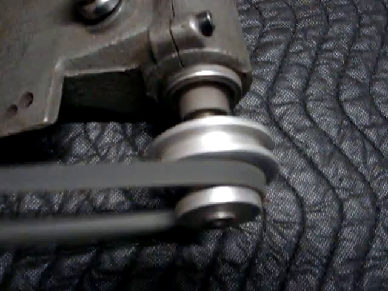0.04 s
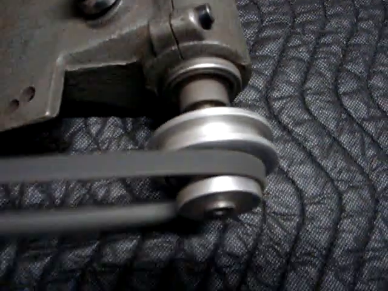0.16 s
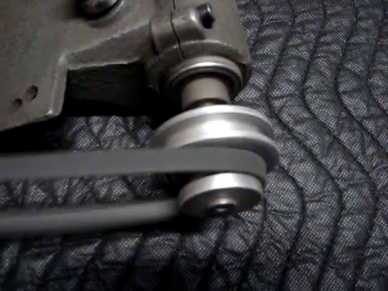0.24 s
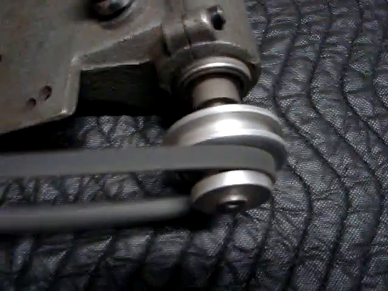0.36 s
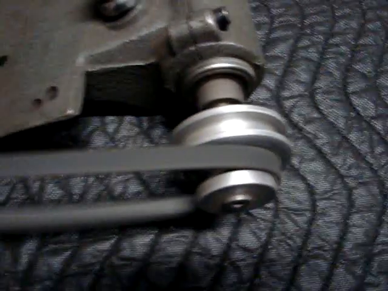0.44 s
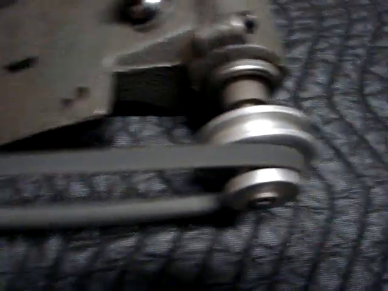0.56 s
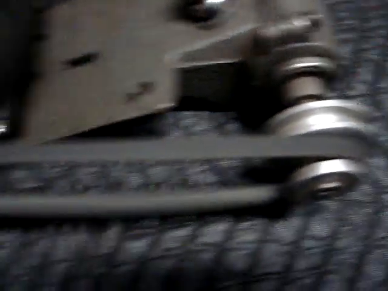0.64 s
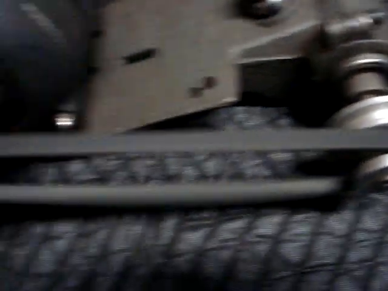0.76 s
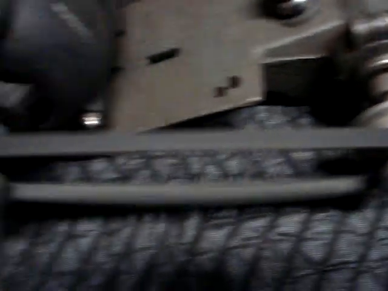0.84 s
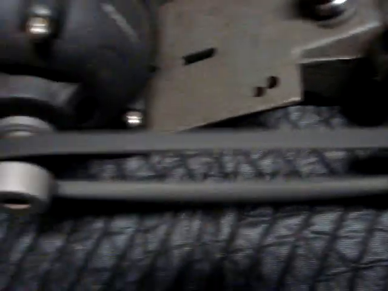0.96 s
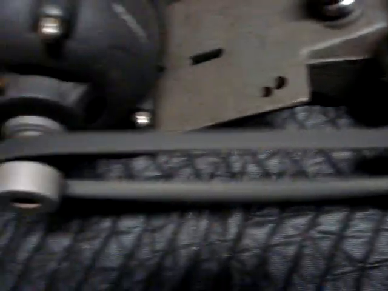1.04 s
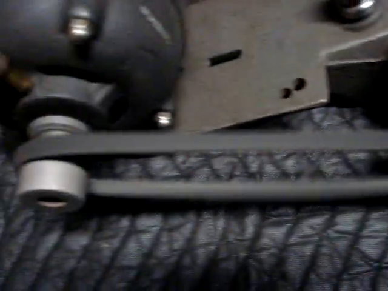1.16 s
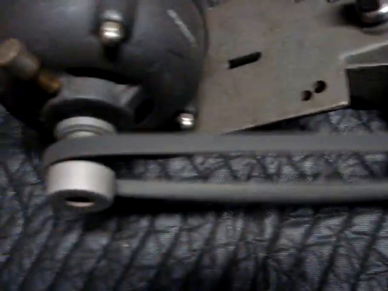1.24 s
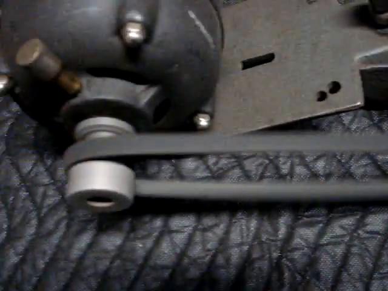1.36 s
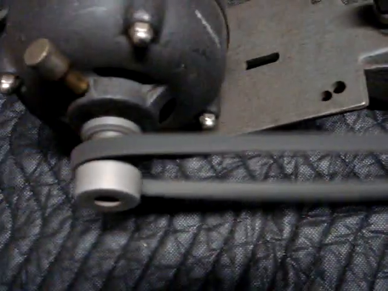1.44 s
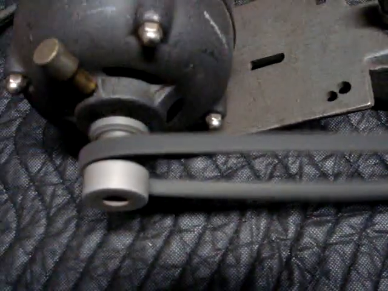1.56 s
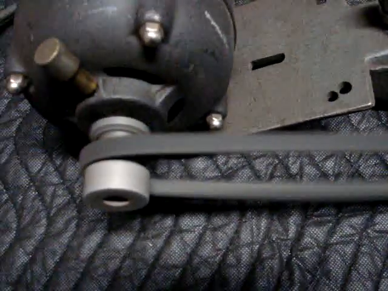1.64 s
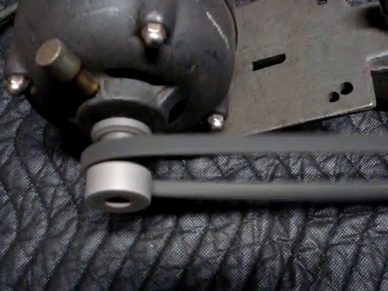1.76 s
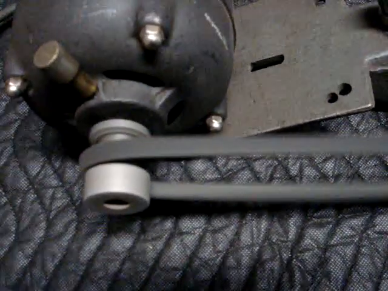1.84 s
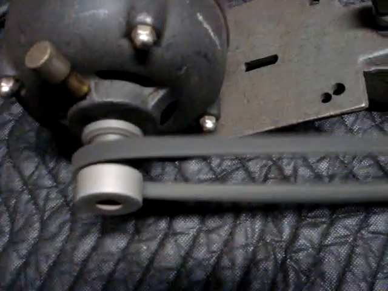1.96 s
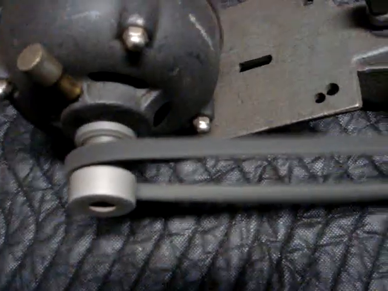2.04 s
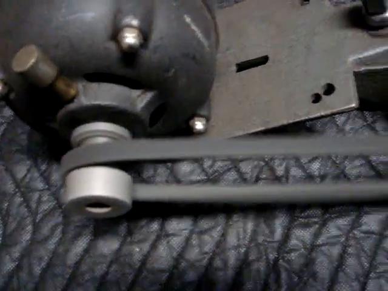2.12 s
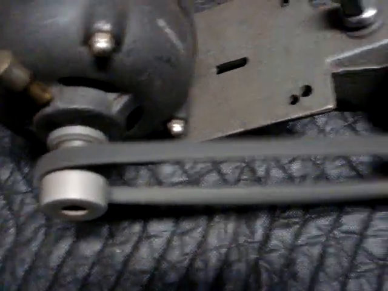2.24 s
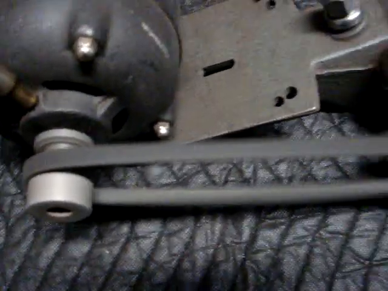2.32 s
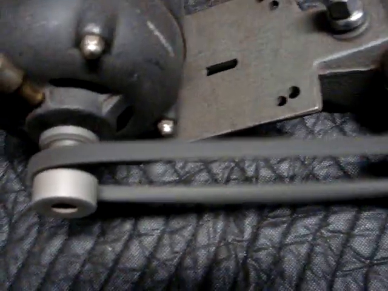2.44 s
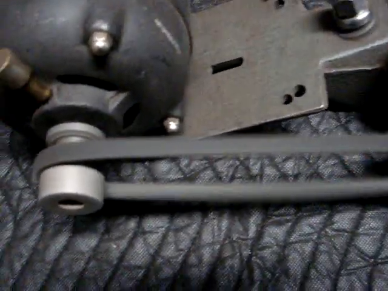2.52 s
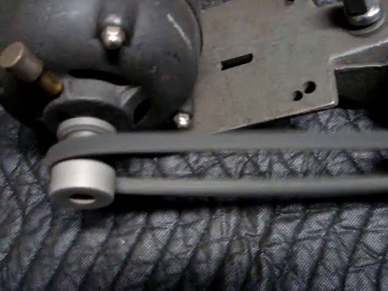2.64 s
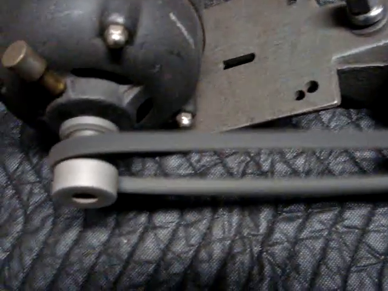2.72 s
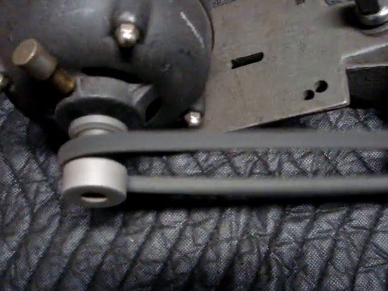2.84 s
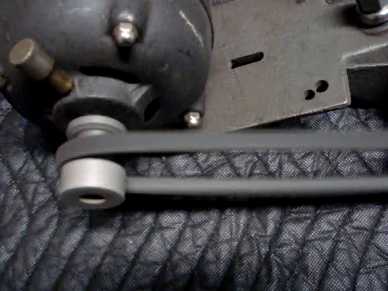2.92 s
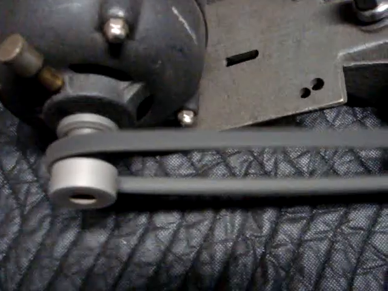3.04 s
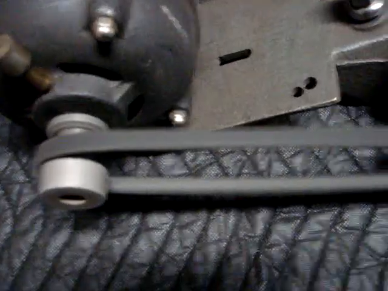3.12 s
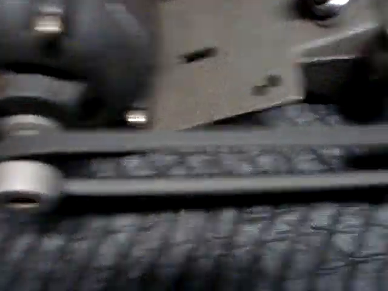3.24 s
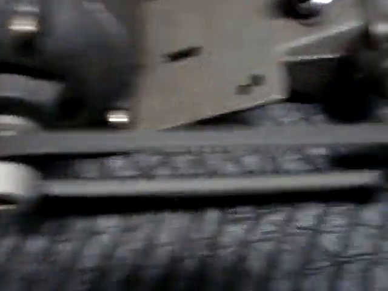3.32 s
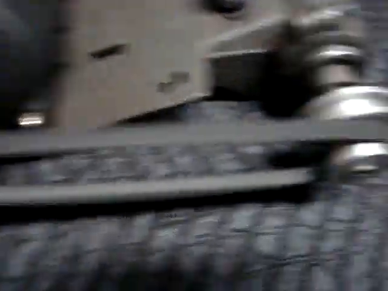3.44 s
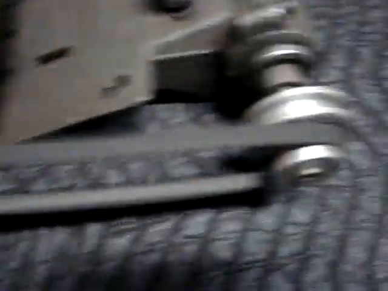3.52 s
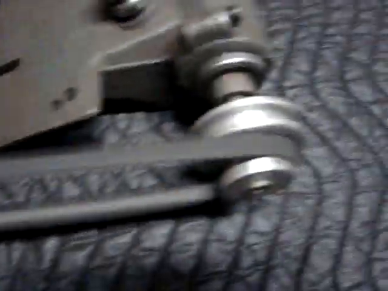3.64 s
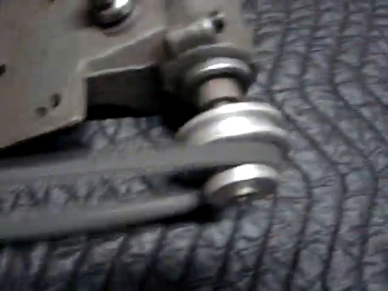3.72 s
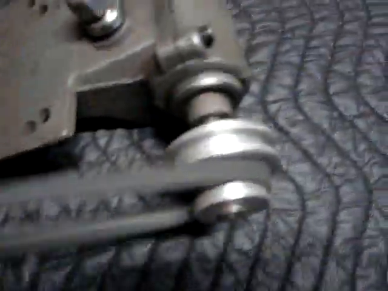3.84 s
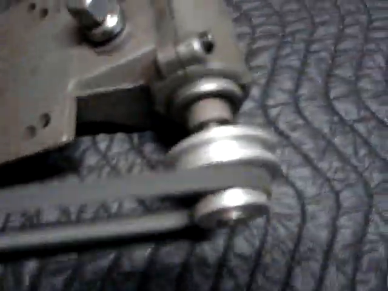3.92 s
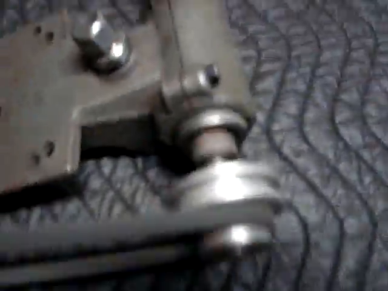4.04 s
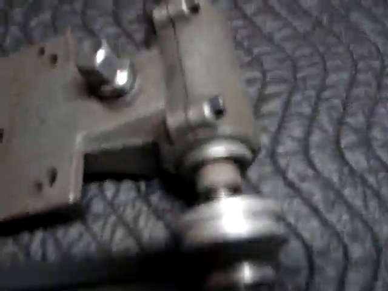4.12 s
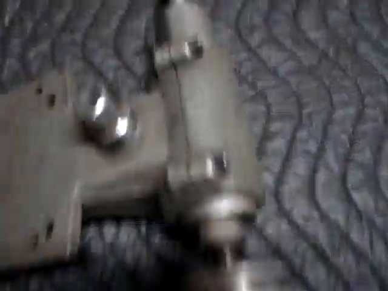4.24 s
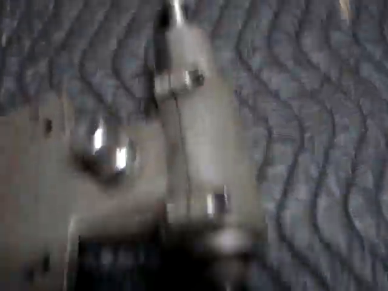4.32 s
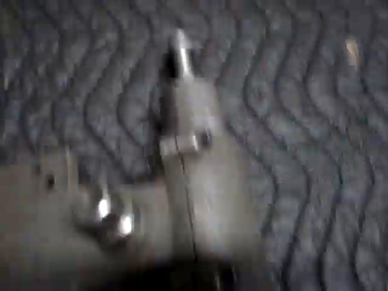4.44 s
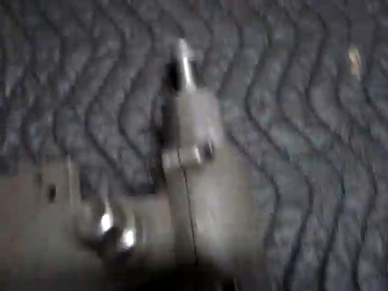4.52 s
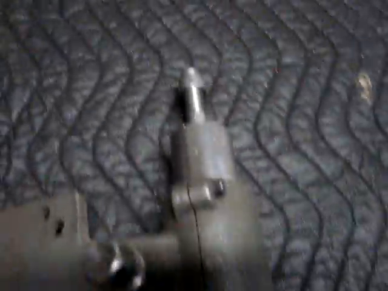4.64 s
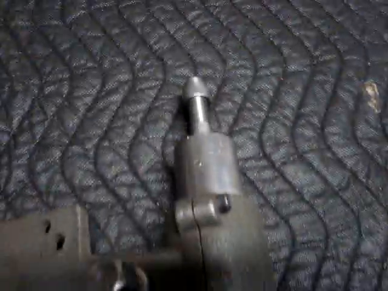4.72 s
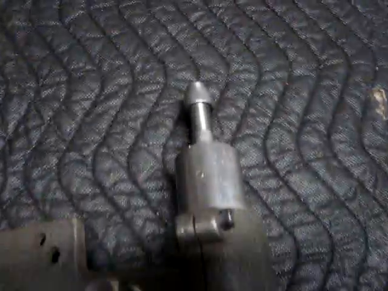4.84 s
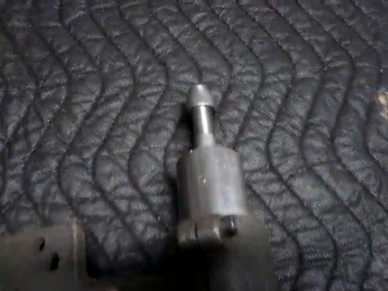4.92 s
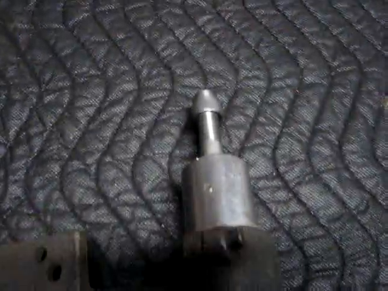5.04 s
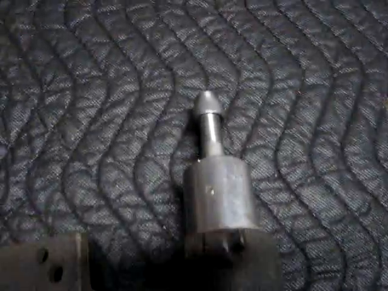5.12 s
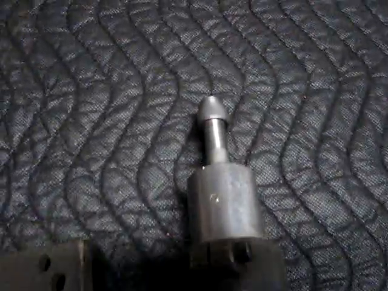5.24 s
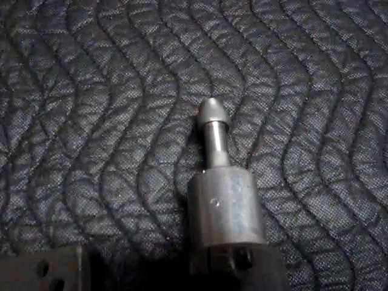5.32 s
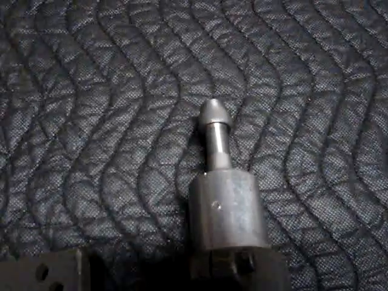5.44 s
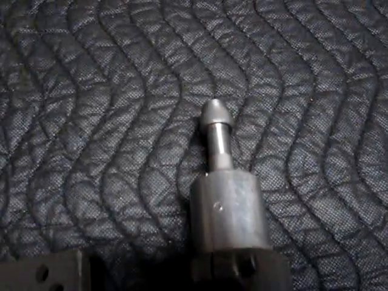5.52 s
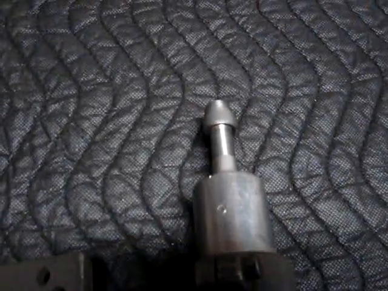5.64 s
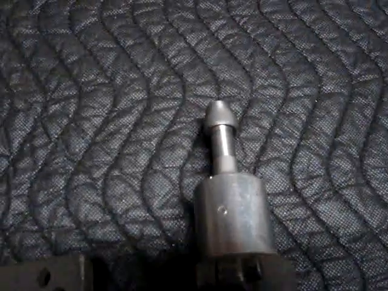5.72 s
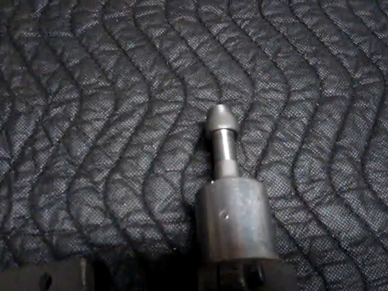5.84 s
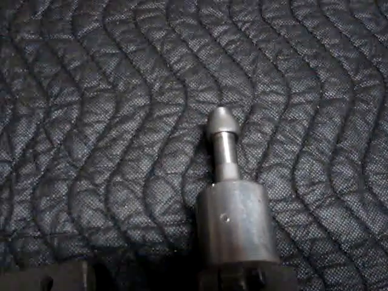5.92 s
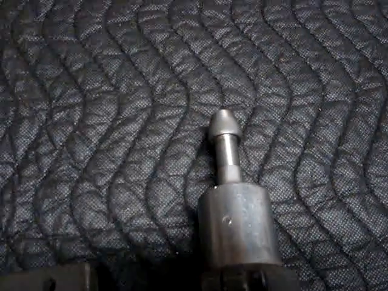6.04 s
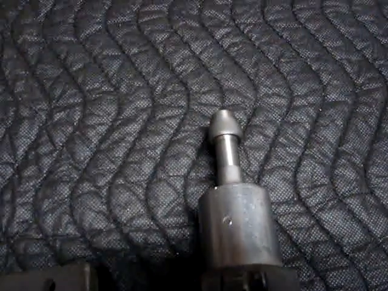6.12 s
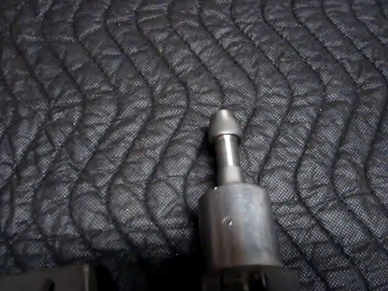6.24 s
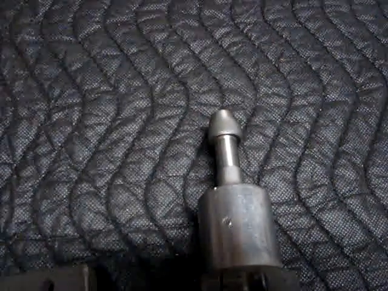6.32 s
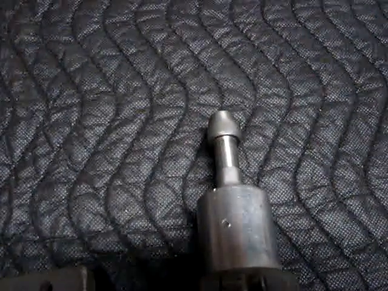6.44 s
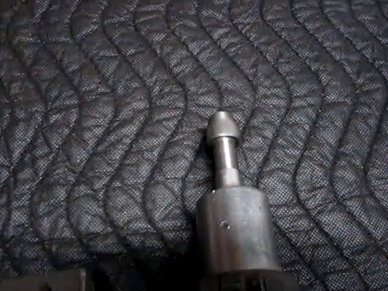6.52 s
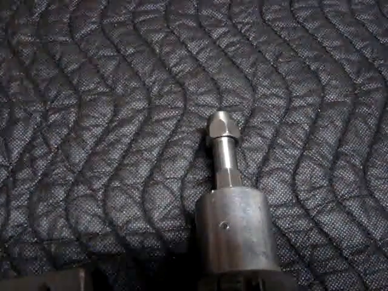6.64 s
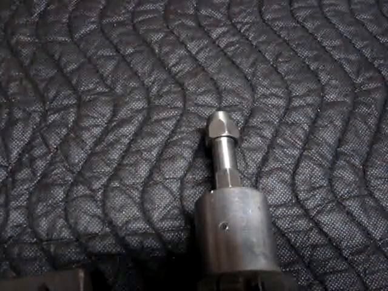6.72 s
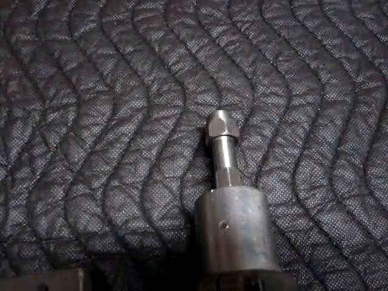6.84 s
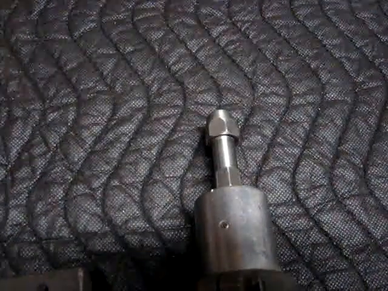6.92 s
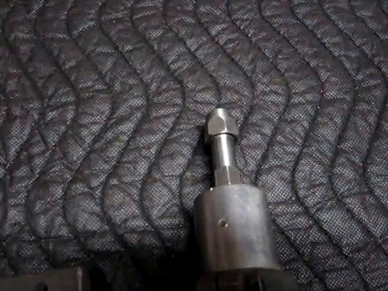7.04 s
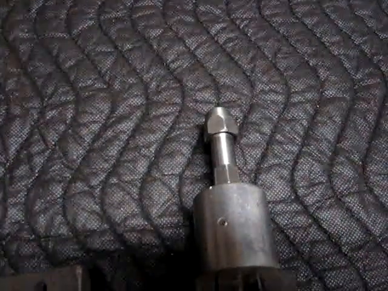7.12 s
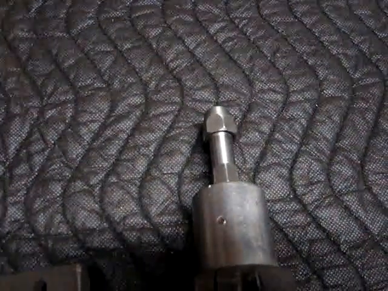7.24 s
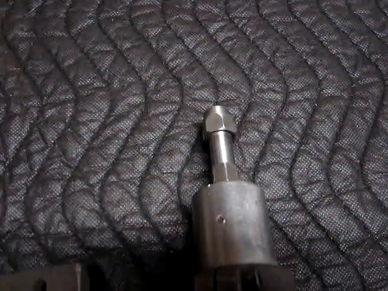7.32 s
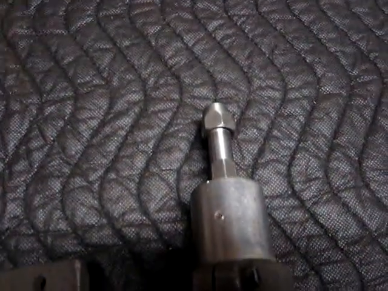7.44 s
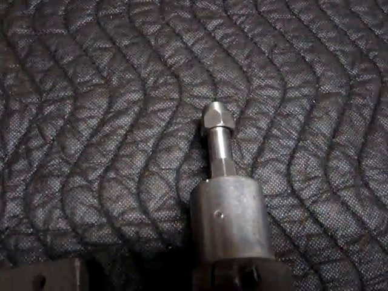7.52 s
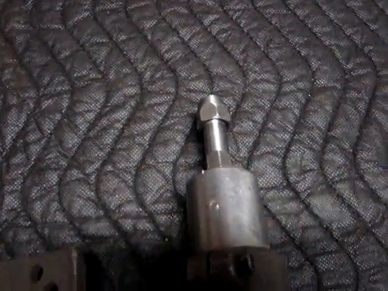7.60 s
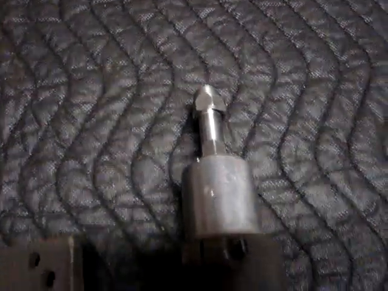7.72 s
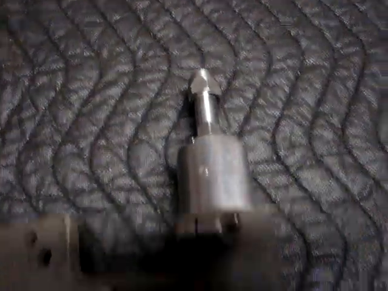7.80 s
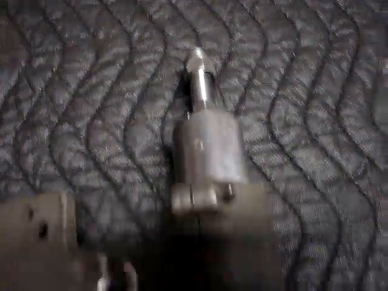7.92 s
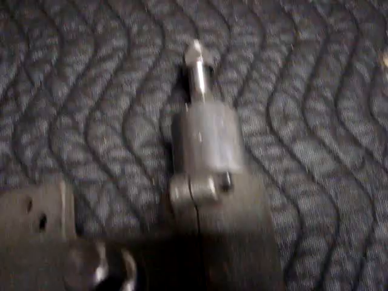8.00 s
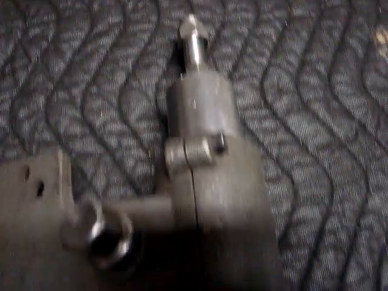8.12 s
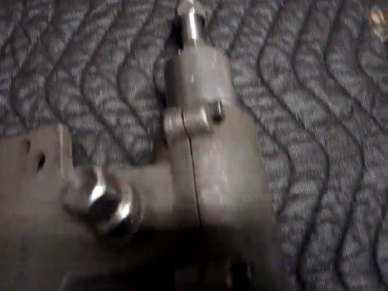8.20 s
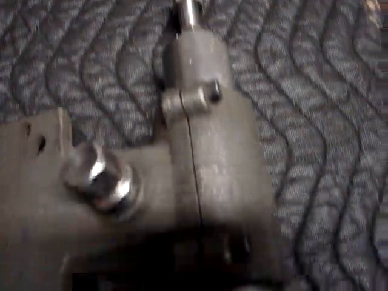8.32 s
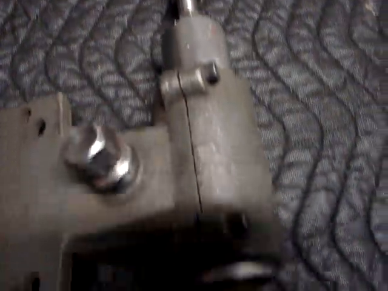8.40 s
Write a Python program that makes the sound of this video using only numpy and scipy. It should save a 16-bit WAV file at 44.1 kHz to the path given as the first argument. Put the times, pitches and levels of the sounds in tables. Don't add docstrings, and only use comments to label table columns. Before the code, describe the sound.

Close-up of a small electric motor and spindle running at full speed, its whine sliding down into lumpy rattling and silence, followed by soft hand bumps.

```python
import sys
import numpy as np
from scipy import signal
from scipy.fft import rfft, irfft, next_fast_len
from scipy.io import wavfile
from scipy.ndimage import uniform_filter1d

SR = 44100
rng = np.random.default_rng(int(sys.argv[2]) if len(sys.argv) > 2 else 0)


def how_loud(loudness_db):
    steps = np.asarray(loudness_db, float) / 20
    return 10 ** steps


def master_out(mix):
    frames = np.transpose(np.atleast_2d(mix))
    ceiling = np.clip(frames, -1, 1)
    pcm = np.round(ceiling * 32767).astype(np.int16)
    wavfile.write(sys.argv[1], SR, pcm)


N = 373527


def rms_one(x):
    return x / np.sqrt(np.mean(x ** 2) + 1e-20)


def in_time(rows):
    time_s, *columns = np.transpose(rows)
    return [np.interp(np.arange(N) / SR, time_s, column) for column in columns]


def drift(rate_hz):
    pole = np.exp(-80 * np.pi * rate_hz / SR)
    noise = rng.standard_normal(N // 40 + 2002)
    slow = signal.lfilter([1], [1, -2 * pole, pole * pole], noise)[2000:]
    return np.interp(np.arange(N) / 40, np.arange(len(slow)), rms_one(slow))


def resonance_db(hz, centre_hz, width_hz, rise_db):
    return rise_db / (1 + (2 * (hz - centre_hz) / width_hz) ** 2)


def shaped(x, colour, modes, edges_hz):
    size = next_fast_len(N)
    hz = np.maximum(np.arange(size // 2 + 1) * SR / size, 1)
    colour_hz, colour_db = np.transpose(colour)
    gain = how_loud(np.interp(np.log(hz), np.log(colour_hz), colour_db))
    for mode in modes:
        gain = gain * how_loud(resonance_db(hz, *mode))
    below = [0 * hz] + [1 / (1 + (hz / edge) ** 12) for edge in edges_hz] + [1 + 0 * hz]
    spectrum = rfft(x, size) * gain
    bands = [irfft(spectrum * (upper - lower), size)[:N] for lower, upper in zip(below, below[1:])]
    return np.array([rms_one(band) for band in bands])


COLD_HZ, WARM_HZ, SWITCH_OFF_S = 140., 141.4, 2.556
FRICTION_HZ_PER_S, DRAG_PER_S = 24.12, .1415


def shaft():
    t = np.arange(N) / SR
    rest_hz = FRICTION_HZ_PER_S / DRAG_PER_S
    powered = COLD_HZ + (WARM_HZ - COLD_HZ) * t / SWITCH_OFF_S
    coast = (WARM_HZ + rest_hz) * np.exp(-DRAG_PER_S * (t - SWITCH_OFF_S)) - rest_hz
    return np.clip(np.minimum(powered, coast), .3, None)


ROLL_FROM_CYCLES, ROLL_DB_PER_CYCLE = 74, .16


def race(balls_per_turn, first, last, side_offset, main_db, side_db):
    rows = []
    for k in range(first, last + 1):
        main = k * balls_per_turn
        for cycles, db in ((main, main_db), (main + side_offset, side_db)):
            loss_db = ROLL_DB_PER_CYCLE * max(cycles - ROLL_FROM_CYCLES, 0)
            rows.append((cycles, *(np.array(db) - loss_db)))
    return rows


# cycles_per_turn,
# motor_db, pulley_db, nose_db (over rolling noise)
SINGLE_TONES = [(6.7, -38, -31, -22), (7.6, -23, -30, -40), (10.1, -38, -26, -36), (10.6, -27, -31, -36),
                (11.0, -33, -29, -20), (11.9, -30, -27, -36), (12.75, -28, -33, -22), (16.0, -18, -22, -28),
                (23.3, -36, -33, -25), (24.3, -25, -33, -36), (25.9, -19, -23, -36), (26.9, -20, -21, -30),
                (28.3, -36, -35, -25), (29.55, -25, -36, -36), (30.0, -22, -36, -36), (30.9, -19, -22, -30),
                (32.2, -20, -19, -32), (35.05, -19, -19, -30), (37.1, -24, -24, -36), (42.1, -24, -33, -36),
                (43.15, -24, -25, -30), (45.2, -22, -22, -26), (15.3, -29, -30, -19), (59.85, -17, -33, -36),
                (61.4, -25, -36, -36), (62.95, -25, -33, -36), (66.9, -22, -30, -33), (70.1, -20, -17, -23),
                (70.6, -24, -20, -20), (71.4, -30, -16, -15)]
# time_s, place (0 motor, 1 spindle pulley, 2 spindle nose)
NEAREST_BEARING = [
    (0, .7),
    (.7, .7),
    (1.2, 0),
    (2.55, 0),
    (2.75, 1),
    (3.5, 1),
    (3.9, 2),
    (8.5, 2),
]
# centre_hz, width_hz, rise_db
COAST_FLARES = [(620, 104, -1), (1052, 52, 3.5), (1615, 75, 4), (2040, 210, -1), (2700, 130, 4),
                (3630, 170, 3.5), (4394, 280, 10), (6730, 390, 6.5), (4770, 450, 9.5), (7140, 210, -13.5),
                (9580, 610, 7.5)]
NOSE_RACE, PULLEY_RACE = (5.187, 4, 25, 1.03), (5.009, 6, 20, .95)
# motor_db, pulley_db, nose_db
NOSE_DB, NOSE_SIDE_DB = (-36, -29, -20.5), (-34, -30, -24)
PULLEY_DB, PULLEY_SIDE_DB = (-34, -24, -30), (-31, -26, -33)
HIGH_FADE_HZ, HIGH_FADE_DB = 45, 9


def tones(turns, speed):
    (nearest,) = in_time(NEAREST_BEARING)
    wavers = [drift(15.8) for _ in range(12)]
    slips = [drift(30) for _ in range(7)]
    slowness = 1 - speed / speed.max()
    coasting = np.clip(20 * slowness, 0, 1)
    boost_db = np.interp(nearest, range(3), [2.5, 2.5, 3.0]) + 2.5 * np.clip(2 - speed / 30, 0, 1)
    blur_db = HIGH_FADE_DB * np.clip(2 - 2 * speed / HIGH_FADE_HZ, 0, 1)
    looseness = .004 + .007 * slowness
    grid_hz = np.arange(SR // 2)
    flare_db = -5.0 + sum(resonance_db(grid_hz, *flare) for flare in COAST_FLARES)
    nose = race(*NOSE_RACE, NOSE_DB, NOSE_SIDE_DB)
    pulley = race(*PULLEY_RACE, PULLEY_DB, PULLEY_SIDE_DB)
    out = np.zeros(N)
    for k, (cycles, *places_db) in enumerate(SINGLE_TONES + nose + pulley):
        tone_hz = cycles * speed
        level_db = np.interp(nearest, range(3), places_db) + boost_db
        level_db += (2.0 + 1.6 * coasting) * wavers[k % 12]
        level_db += coasting * flare_db[np.minimum(tone_hz, SR // 2 - 1).astype(int)]
        level_db -= blur_db * (70 < cycles < 72)
        skid = looseness * (1 + .45 * coasting * (cycles > 68))
        phase = cycles * (2 * np.pi * turns + skid * slips[k % 7]) + k * k
        out += (tone_hz < .45 * SR) * how_loud(level_db) * np.sin(phase)
    return out


def rolling_lumps(speed):
    slowness = 1 - speed / speed.max()
    lumps = how_loud((0.41 + 1.1 * slowness ** 5) * drift(48) + .5 * drift(4.9))
    return lumps / np.sqrt(uniform_filter1d(lumps ** 2, size=SR // 4))


# time_s, level_db
RACE_GRIP = [(0, 0.5), (.7, 0.5), (1.6, 0), (2.5, 0), (3.0, 0), (3.5, 0), (4.0, 1), (4.5, 0), (5.2, 1),
             (5.6, 3.5), (5.9, 3), (6.28, 1.5), (6.55, 0), (6.68, -1), (6.79, -14), (6.9, -40)]
STILL_S = RACE_GRIP[-1][0]
# motor_db, pulley_db, nose_db, knee_hz, loss_db (per halving of speed below the knee)
HOUSING_PARTS = [
    (-21, -17, -27, 75, 5.5),
    (-24.5, -27.5, -25., 14, 4),
    (-21, -28., -23.5, 16.2, 9.5),
    (-22, -19.5, -17.5, 47.2, 9),
]
TURN_IN_S, TURN_IN_LENGTH_S, TURNED_AWAY_DB = 0.76, 0.29, -2.5


def radiated_db(speed, place):
    (grip_db,) = in_time(RACE_GRIP)
    rows = []
    for *near_db, knee_hz, loss_db in HOUSING_PARTS:
        slow_db = loss_db * np.log2(1 + knee_hz / speed)
        rows.append(grip_db + np.interp(place, range(3), near_db) - slow_db)
    away = np.clip((TURN_IN_S - np.arange(N) / SR) / TURN_IN_LENGTH_S, 0, 1)
    return np.array(rows) + TURNED_AWAY_DB * away * np.array([[0], [0], [1], [1]])


SHAKE_DB, SHAKE_KNEE_HZ, SHAKE_DB_PER_HALVING = -63.5, 113, 22
SHAKE_PEAK_HZ, SHAKE_PEAK_WIDTH_HZ, SHAKE_PEAK_DB = 128, 9, 6


def shake(turns, speed):
    slow_db = SHAKE_DB_PER_HALVING * np.log2(np.maximum(SHAKE_KNEE_HZ / speed, 1))
    level_db = SHAKE_DB + resonance_db(speed, SHAKE_PEAK_HZ, SHAKE_PEAK_WIDTH_HZ, SHAKE_PEAK_DB) - slow_db
    return how_loud(level_db + 1.2 * drift(4)) * np.sin(2 * np.pi * turns)


PART_EDGES_HZ = (880, 1350, 3200)
# freq_hz, level_db (per Hz)
MOTOR_COLOUR = [(120, -75), (200, -36), (306, -27.5), (651, -1), (1050, -8), (1300, -5), (1660, 0.5),
                (1980, -10), (2300, -6.5), (2540, -8), (3460, -10), (4360, -7.5), (10000, -15),
                (13100, -49), (22000, -120)]
PULLEY_COLOUR = [(120, -69.5), (200, -41), (411, -21.5), (600, -1.5), (889, -13.5), (1140, 8), (1340, -3),
                 (1980, -5.5), (2380, -7), (3580, -20.5), (4360, -24.5), (7120, -14), (10000, -25.5),
                 (13100, -63), (22000, -120)]
SPINDLE_COLOUR = [(120, -65.5), (200, -35), (379, -22), (600, -7), (889, -19.5), (1160, -7.5),
                  (1360, -10.5), (1980, -11), (2420, -15), (3640, -15.5), (4290, -11), (5220, -17),
                  (10000, -23), (13100, -60), (22000, -120)]
# centre_hz, width_hz, rise_db
MOTOR_MODES = [(697, 140, 2.5), (765, 12, -7), (1270, 50, -5), (1530, 110, -2), (1685, 120, -2.5),
               (4530, 100, 2.5), (6200, 680, 1.5), (9830, 69, 3)]
PULLEY_MODES = [(680, 320, 5.4), (1060, 160, 3.5), (1540, 120, 3.8), (2290, 64, 1.7), (4870, 220, 2),
                (6600, 1200, 2.8), (8660, 220, 2.8)]
SPINDLE_MODES = [(644, 180, 9), (1010, 73, 8.7), (1147, 38, 10.9), (1186, 21, 9.2), (1629, 29, 5.4),
                 (2404, 130, 12.3), (3580, 120, 2.6), (4200, 140, 4.2), (4895, 88, 8), (5500, 150, 6),
                 (5960, 1000, 4.2), (8500, 260, 4.4), (9500, 420, 5.6)]
# time_s, place (0 motor, 1 spindle pulley, 2 spindle nose)
MICROPHONE_PATH = [
    (0, 0.13),
    (.6, 0.11),
    (1.15, 0.0094),
    (2.8, 0.02),
    (3.4, 0.43),
    (3.8, 1.04),
    (4.25, 1.33),
    (4.7, 1.5),
    (5.2, 2),
    (8.5, 2.19),
]


def grinder():
    speed = shaft()
    turns = np.cumsum(speed) / SR
    (place,) = np.clip(in_time(MICROPHONE_PATH), 0, 2)
    toward = np.minimum(place, 1)
    passing = 1 - np.abs(place - 1)
    whine, lumps = tones(turns, speed), rolling_lumps(speed)

    def housing(colour, modes):
        return shaped(lumps * (rng.standard_normal(N) + whine), colour, modes, PART_EDGES_HZ)

    motor = housing(MOTOR_COLOUR, MOTOR_MODES)
    spindle = housing(SPINDLE_COLOUR, SPINDLE_MODES)
    pulley = housing(PULLEY_COLOUR, PULLEY_MODES)
    parts = np.sqrt(1 - toward) * motor + np.sqrt(toward) * spindle
    parts = np.sqrt(1 - passing) * parts + np.sqrt(passing) * pulley
    parts[1] *= catching()
    running = np.arange(N) / SR < STILL_S
    return running * np.sum(how_loud(radiated_db(speed, place)) * parts, axis=0) + shake(turns, speed)


# freq_hz, level_db (per Hz)
AIR_COLOUR = [(15, -78.5), (25, -30), (53, -29.5), (88, -10), (125, -9.5), (278, -10.5), (315, -11.5),
              (395, -12), (437, -12.5), (999, -15), (3590, -24.5), (10000, -31), (13100, -70),
              (22000, -120)]
# centre_hz, width_hz, rise_db
AIR_MODES = [(105, 25, 1.5), (135, 15, 8), (253, 28, -2), (338, 40, 0.5), (450, 97, 1), (590, 55, 2.5)]
# time_s, level_db
HANDLING = [
    (0, 3.5),
    (6.9, 7),
    (7.6, 8),
    (8.0, 10),
    (8.47, 11),
]
AIR_DB, AIR_FOLLOWS_HAND, AIR_RISE_DB, RUMBLE_DB = -54, 0.092, 1.5, -72


def workshop():
    (hand_db,) = in_time(HANDLING)
    stopped = np.clip(2 * (np.arange(N) / SR - STILL_S), 0, 1)
    air_db = AIR_DB + AIR_FOLLOWS_HAND * hand_db + AIR_RISE_DB * stopped
    rumble_db = RUMBLE_DB + hand_db
    rumble, air = shaped(rng.standard_normal(N), AIR_COLOUR, AIR_MODES, [190.])
    return how_loud(rumble_db + 1.5 * drift(8)) * rumble + how_loud(air_db + .7 * drift(10)) * air


# start_s, peak_db, pitch_hz,
# t60_s
SWELLS_AND_CREAKS = [(3.2, -47, 131, 0.37), (4.45, -50, 135, 0.29), (5.701, -53, 135.5, 0.25),
                     (7.0, -54, 110, 0.13), (7.13, -52, 135, .12), (7.36, -57, 350, 0.14),
                     (7.53, -46, 141, 0.28), (7.8, -53, 102, 0.27), (7.55, -46, 580, .1),
                     (7.85, -50, 620, 0.092), (7.98, -52, 105, .2), (8.081, -47, 248, .15),
                     (8.1, -54, 3530, 0.06), (8.16, -54, 240, 0.11), (8.271, -46, 450, 0.12),
                     (8.28, -55, 105, 0.22)]


def creaks():
    out = np.zeros(N)
    for start_s, peak_db, pitch_hz, t60_s in SWELLS_AND_CREAKS:
        start = round(start_s * SR)
        rub = rng.standard_normal(SR // 10)
        push = np.zeros(N - start)
        push[:len(rub)] = rub * np.hanning(len(rub))
        radius = how_loud(-90 / (t60_s * SR))
        poles = [1, -2 * radius * np.cos(2 * np.pi * pitch_hz / SR), radius * radius]
        ring = push + 1e-18
        for _ in range(2):
            ring = signal.lfilter([1, 0, -1], poles, ring)
        out[start:] += how_loud(peak_db) * ring / np.abs(ring).max()
    return how_loud(-1.0) * out


# time_s, swell_db, length_s
SPINDLE_CATCHES = [(6.06, 3.5, 0.014), (6.12, -1, .01), (6.142, 10, 0.0081), (6.169, 6.5, 0.012),
                   (6.195, 2, 0.0065), (6.215, 9.5, 0.0063), (6.242, 11.5, 0.014), (6.267, 3.5, .008),
                   (6.292, 6.5, 0.021), (6.332, 6.5, 0.028), (6.389, 8, 0.0052), (6.42, 9.5, 0.021),
                   (6.462, 6, 0.011), (6.491, 11.5, 0.025), (6.563, 8, 0.034), (6.633, 7, .01),
                   (6.744, 7, 0.011)]


def catching():
    t = np.arange(N) / SR
    swell_db = sum(db * np.exp(-((t - time_s) / length_s) ** 2) for time_s, db, length_s in SPINDLE_CATCHES)
    sink_db = 2.9 * np.clip(3.2 * (t - SPINDLE_CATCHES[0][0]) + 1, 0, 1)
    return how_loud(swell_db - sink_db)


def scene():
    return np.tile(grinder() + workshop() + creaks(), (2, 1))


def roll_off(x):
    return signal.sosfilt(signal.butter(12, 10930, fs=SR, output="sos"), x)


def record(dry):
    thin = signal.sosfilt(signal.butter(1, 12., "high", fs=SR, output="sos"), dry)
    cut = signal.sosfilt(signal.ellip(12, .5, 75, 10070, fs=SR, output="sos"), thin)
    return roll_off(cut)


dry = scene()
out = record(dry)
master_out(out)
```